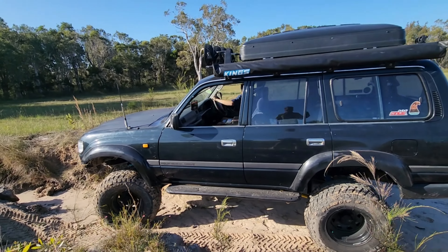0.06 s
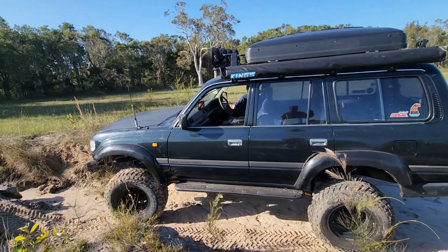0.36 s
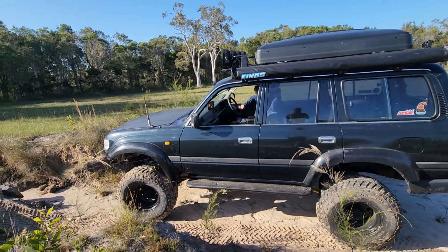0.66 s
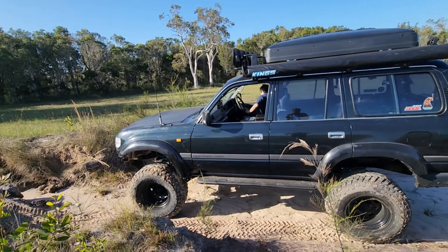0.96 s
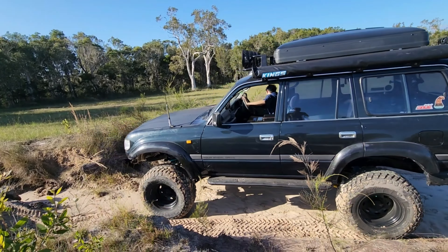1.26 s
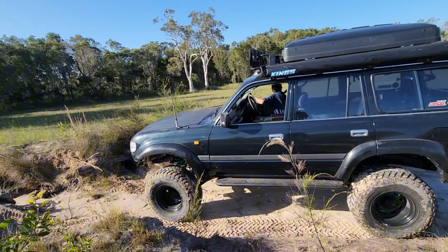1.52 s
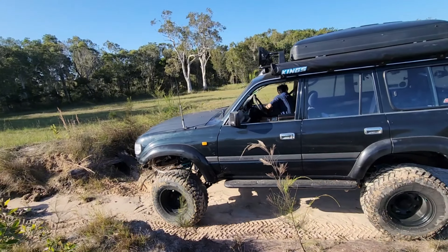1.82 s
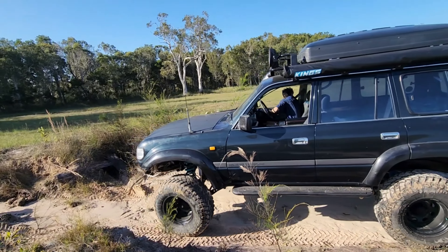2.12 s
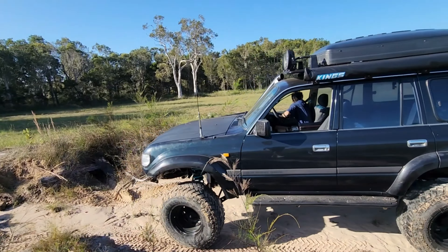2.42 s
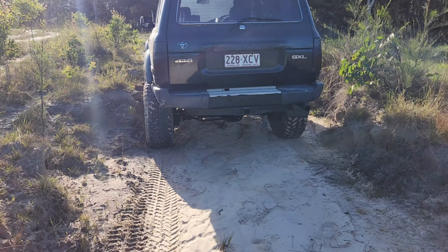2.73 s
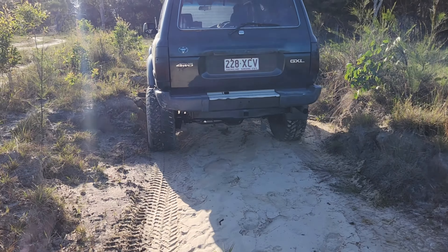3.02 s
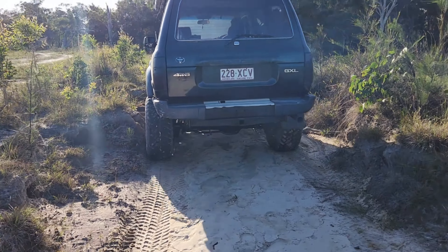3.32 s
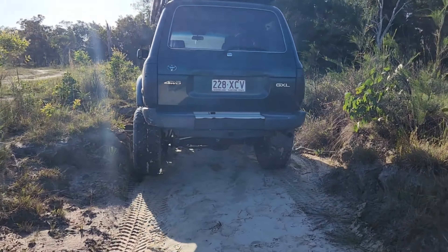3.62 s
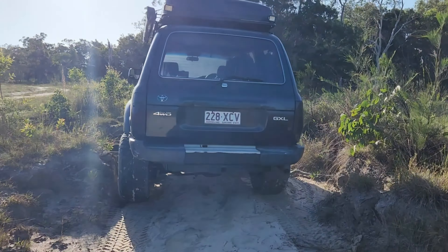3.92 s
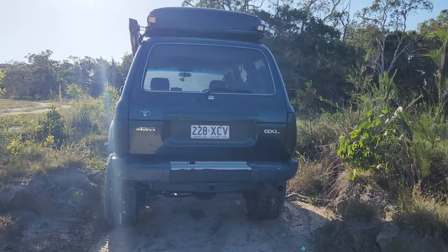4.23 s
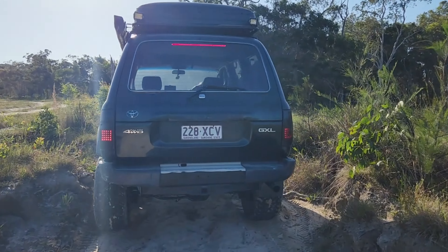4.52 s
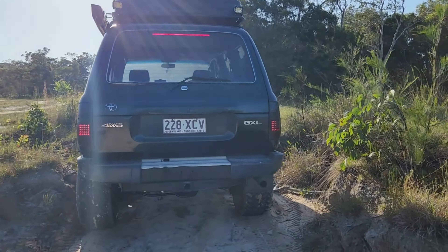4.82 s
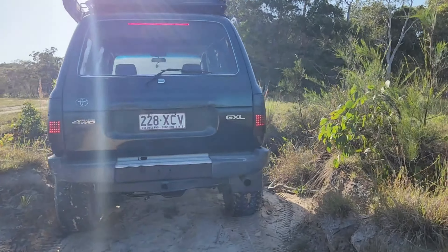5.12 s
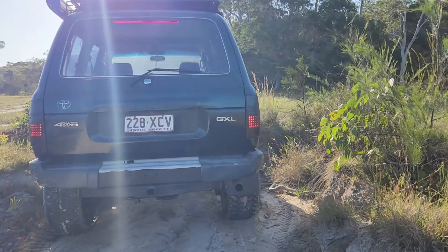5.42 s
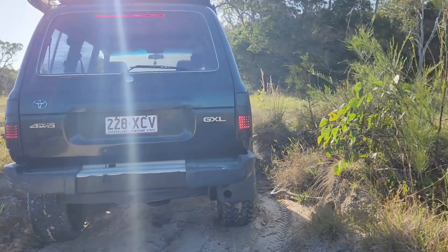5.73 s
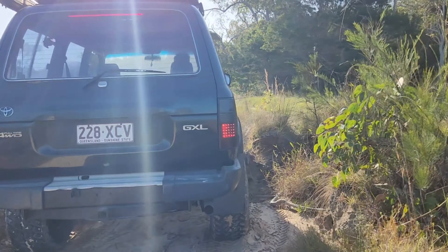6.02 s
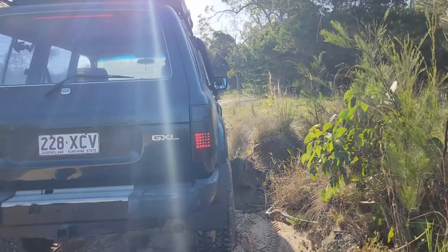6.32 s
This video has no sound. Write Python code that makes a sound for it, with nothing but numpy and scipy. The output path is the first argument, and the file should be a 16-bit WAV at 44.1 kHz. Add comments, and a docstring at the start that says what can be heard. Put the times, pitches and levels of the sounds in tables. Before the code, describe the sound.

Deep engine rumble from an off-road vehicle rises and falls, with one raspy rev, hissing sand and a few clacks before idling.

```python
"""A six-cylinder four-wheel-drive crawls through soft sand, heard side-on, then, after a gap, from behind.
Firing pulses boom in the exhaust pipe, which rasps in one hard rev and then drops to a lumpy idle.
The engine bay whirs, sand hisses under the tyres, metal parts clack, twigs snap,
the body thuds and the suspension creaks once."""
import sys
import numpy as np
from scipy import signal
from scipy.fft import rfft, irfft
from scipy.io import wavfile
from scipy.ndimage import uniform_filter1d

SR = 44100
rng = np.random.default_rng(int(sys.argv[2]) if len(sys.argv) > 2 else 0)


def digitize_waveform(pressure):
    """Quantize a signal to 16-bit integers and store it at the path in sys.argv[1].

    Rows of a 2-D input are taken as channels; values are limited to [-1, 1].
    """
    field = np.atleast_2d(pressure).T
    bounded = np.clip(field, -1, 1)
    quanta = np.round(bounded * 32767).astype(np.int16)
    wavfile.write(sys.argv[1], SR, quanta)


N = 289296
TIME = np.arange(N) / SR
FREQS = np.fft.rfftfreq(N, 1 / SR)
GAP_S = (2.717, 2.779)

# engine speed (time [s], firing rate [Hz])
SPEED = [(0, 45.7), (.17, 46.55), (.28, 45.2), (.55, 31.25), (.87, 30.66), (1.02, 32.7), (1.3, 39.23),
         (1.55, 41.81), (2.06, 42.89), (2.24, 47.7), (2.34, 53.93), (2.52, 56.3), (2.71, 52.8),
         (2.79, 45.84), (3.5, 47.24), (3.62, 53.84), (3.83, 76.96), (3.95, 78), (4.06, 70.23),
         (4.26, 46.95), (4.44, 33.68), (4.8, 32.27), (5.05, 34.35), (5.5, 32.35), (6, 33.99), (6.56, 33.08)]
# throttle stab (time [s], half-width [s], rasp swell [dB])
STAB = [(3.81, 0.22, 15.5)]
# nearness of engine bay and tyres (time [s], gain [dB])
NEARNESS = [(0, 0.5), (.8, 0.5), (2.1, 3), (2.71, 5), (2.79, 1.5), (3.5, 4), (4.1, -5), (4.8, -4),
            (5.8, -2), (6.3, 0), (6.56, 2)]


def exhaust(turns, puff_decay_turns=0.96, tone_lag_turns=0.4, rasp_gain_db=-2):
    """Firing pulses, each with a puff of turbulent gas, ring the pipe; high modes open up under load."""
    # pipe resonances (centre [Hz], width [Hz], side gain [dB], rear gain [dB])
    boom_modes = [(80.5, 25.4, 6, -4), (89.43, 9.05, 14.5, 16), (116, 14, -3, -9), (126.9, 15, 0.5, 5)]
    drone_modes = [(188.1, 20, 6.5, 8.5), (209.5, 14.4, 5.5, 5), (234.9, 18, -30, -11.5),
                   (275.2, 18.8, -4.5, -1), (287.7, 12.3, -5.5, -3), (355, 120, -14, -33.5)]
    rasp_modes = [(510, 38, -35.5, -7), (571, 10.1, -9, 3.5), (657, 11.2, -4, 6.5), (736, 19.4, -4.5, -6),
                  (910, 200, -22.5, -19.5)]
    tone_db, boom_db, drone_db, rasp_db = exhaust_levels()
    lumpy = lumpiness()
    pulses = firings(turns)
    puffs = unit(np.exp(-(turns % 1) / puff_decay_turns) * rng.standard_normal(N))
    gas = pulses + .3 * lumpy * puffs
    hiss = np.interp(rasp_db, [-48, -33], [1.6, .35]) * puffs  # under load the pulses take over
    growl = unit(pulses * (1 + .15 * np.cos(np.pi * turns)))  # every other firing is harder
    rumble = amp(-7) * np.sqrt(lumpy) * unit(band(puffs, 28, 82, order=2))
    waver = 1 + lumpy * unit(band(rng.standard_normal(N), 1.7, 12, order=2))
    tone = amp(tone_db) * (unit(np.cos(2 * np.pi * (turns - tone_lag_turns))) * waver + rumble)
    boom = amp(boom_db) * steady(band(ring(gas, boom_modes), 60.5, 134.1, order=4))
    drone = amp(drone_db) * steady(band(ring(gas, drone_modes), 164, 335.4, order=5))
    rasp = amp(rasp_db + rasp_gain_db) * steady(band(ring(growl + hiss, rasp_modes), 400, 1300))
    return outdoors(tone + boom + drone + rasp)


def firings(turns, jitter=0.075, bank_lag_turns=0.0052):
    """One pulse a firing, less the firing tone; every other cylinder has a longer manifold path."""
    # cylinders in firing order (strength [dB])
    cylinders = [0.7, 2.1, -1, -0.3, 1.54, 0]
    onsets = np.flatnonzero(np.diff(np.floor(turns))) + 1
    number = np.arange(len(onsets))
    size_error, time_error = rng.standard_normal((len(onsets), 2)).T * lumpiness()[onsets]
    shift = (jitter * time_error + bank_lag_turns * (-1) ** number) * np.gradient(onsets)
    strength = amp(np.take(cylinders, number, mode="wrap")) * (1 + size_error)
    pulses = np.zeros(N)
    pulses[np.clip(onsets + shift.astype(int), 0, N - 1)] = strength
    fundamental = 2 * np.gradient(turns) * np.cos(2 * np.pi * turns)
    return unit(pulses - fundamental)


def lumpiness(idle_hz=35.8, pulling_hz=45.7, pulling_share=.08):
    """The firings turn uneven as the engine drops to idle."""
    idling = np.interp(curves(SPEED)[0], [idle_hz, pulling_hz], [1, 0])
    idle_share = viewpoint(side=.12, behind=.28)
    return pulling_share + idling * (idle_share - pulling_share)


def exhaust_levels(fade_s=0.014):
    """Tone, boom, drone and rasp gains in dB; the pipe swells as firing harmonics cross its modes."""
    # resonance crossings (firing rate [Hz], half-width [Hz], swell [dB])
    boom_swells = [(38.2, 2.2, 3), (47.9, 4.5, 9.5), (59.93, 6.8, 9.5)]
    drone_swells = [(41.5, 2.5, 3.9), (48.4, 2.6, 3.26), (66, 1.5, 0.89), (72.94, 5, 4.87)]
    # spells of thin bass (start [s], end [s], tone gain [dB], boom gain [dB])
    thin_bass = [(-.1, 1.05, -7.5, 0), (2.7, 3.065, -9.5, -5)]
    firing_hz, = curves(SPEED)
    tone_dip_db, boom_dip_db = sum(
        np.outer(db, np.clip(np.minimum(TIME - start, end - TIME) / fade_s, 0, 1))
        for start, end, *db in thin_bass)
    tone_db = loudness(-32, -31.5, per_effort=2.4, db_per_octave=19)
    boom_db = loudness(-31, -26, per_effort=2.56, db_per_octave=1.5) + swell(firing_hz, boom_swells)
    drone_db = loudness(-31.5, -28.5, per_effort=1.83, db_per_octave=11) + swell(firing_hz, drone_swells)
    rasp_db = loudness(-48.5, -47.5, per_effort=1.07, db_per_octave=13) + swell(TIME, STAB)
    return tone_db + tone_dip_db, boom_db + boom_dip_db, drone_db, rasp_db


def loudness(side_db, behind_db, db_per_octave, per_effort=0, cruise_hz=46):
    """A layer's gain in dB, growing with engine effort and speed."""
    # how hard the engine works (time [s], effort [dB])
    effort = [(0, 4), (.24, 1), (.32, -2), (.5, -4), (.6, -2), (.78, -3.5), (.95, 0), (1.2, 0.1),
              (2.05, -0.5), (2.24, 2), (2.45, -1.5), (2.71, -3.5), (2.79, 2), (3.5, 2), (3.7, 2), (3.83, 2),
              (3.95, -1), (4.06, 0.5), (4.11, -5), (4.18, -1.5), (4.4, -4), (4.9, -0.5), (5.3, -2),
              (5.6, -0.2), (5.9, -2), (6.56, -2)]
    octaves = np.log2(curves(SPEED)[0] / cruise_hz)
    return viewpoint(side_db, behind_db) + per_effort * curves(effort)[0] + db_per_octave * octaves


def engine_bay(turns, throb=0.1, whine_order=30, shield_hz=4250, stab_share=.2, gain_db=4.5):
    """Fan and valve gear whir and throb with the firings; the alternator whines, a heat shield sings."""
    # whir spectra (frequency [Hz], relative density [dB])
    whir_side = [(300, 18.5), (460, -3), (700, 1.5), (1000, -3.5), (1450, -2.5), (1800, 0), (2050, 1.5),
                 (2250, 1.5), (2550, -4), (2900, -4), (3400, -6.5), (4800, -14.5)]
    whir_behind = [(300, 9.5), (400, 8.5), (600, 5.5), (830, -3.5), (1080, -3.5), (1280, -3.5),
                   (1550, -3.5), (1800, -2.5), (2050, -2.5), (2230, -0.5), (2600, -11.5), (3100, -13),
                   (4500, -43.5)]
    bay_db = loudness(-48, -51, per_effort=.5, db_per_octave=8.5)
    bay_db += curves(NEARNESS)[0] + stab_share * swell(TIME, STAB)
    noise = (1 + throb * np.cos(2 * np.pi * turns)) * rng.standard_normal((2, N))
    whir = viewpoint(pair(noise, whir_side) * amp([[-.6], [.6]]), pair(noise, whir_behind))
    flutter = unit(band(rng.standard_normal((2, N)), 0.67, 23, order=1))
    whine = amp(-14) * unit(flutter * np.cos(2 * np.pi * whine_order * turns))
    shield = amp(-21 + viewpoint(-1, 0)) * unit(flutter * np.cos(2 * np.pi * shield_hz * TIME))
    return amp(bay_db + gain_db) * (whir + whine + shield)


def sand(fizz_boost_db=5):
    """Rushing air and sand thrown by the tyres: a hiss that crackles when much sand flies."""
    # air and sand spectra (frequency [Hz], relative density [dB])
    rush_colour = [(1800, -14.5), (2900, -0.5), (4200, -2), (5300, -3.5), (6500, -8), (7600, -9.5),
                   (9000, -21), (11000, -27)]
    fizz_colour = [(5000, -13.5), (8000, -9.5), (10000, -14), (12500, -7), (15800, -9)]
    # sand sprays (time [s], half-width [s], fizz before boost [dB], rush [dB])
    sprays = [(.53, 0.15, -67, -66), (1.08, 0.14, -63.5, -74), (1.39, .1, -59.5, -71),
              (2.36, 0.28, -67, -52.5), (3.111, .16, -67.5, -62.5), (3.751, 0.19, -49.5, -42),
              (6.199, 0.25, -71.5, -65), (6.39, 0.072, -57, -62)]
    near_db, = curves(NEARNESS)
    spray_fizz, spray_rush = sum(np.outer(amp(db), bump(TIME, s, width)) for s, width, *db in sprays)
    rush = np.hypot(amp(loudness(-58, -55.5, db_per_octave=8.5) + near_db), spray_rush)
    fizz = np.hypot(amp(loudness(-69, -74.5, db_per_octave=13.5) + near_db), spray_fizz)
    flying = np.interp(20 * np.log10(fizz), [-72, -54], [0.36, amp(3)])
    grit = (rng.standard_normal((2, N)) + flying * grains()) / np.hypot(1, flying)
    return rush * pair(grit, rush_colour) + amp(fizz_boost_db) * fizz * pair(grit, fizz_colour)


def grains(per_s=1000, spread_db=2):
    """Sand grains click, mostly small, a few large."""
    size = amp(spread_db * np.minimum(rng.exponential(1, (2, N)), 4))
    return unit(size * rng.standard_normal((2, N)) * (rng.random((2, N)) < per_s / SR))


def clacks(band_ratio=1.6, gain_db=-5.5):
    """Metal clacks and snapping twigs: dying noise bursts with a bright edge and a dull knock."""
    # impacts (time [s], relative level [dB], centre [Hz], t60 [s])
    hits = [(.274, -26.5, 3700, 0.068), (.368, -25, 2300, 0.15), (0.382, -29, 6300, 0.066),
            (0.59, -40, 6200, 0.076), (3.093, -24.5, 1900, 0.013), (3.272, -35.5, 5960, 0.015),
            (3.45, -34, 1518, .015), (3.608, -42.5, 1800, 0.019), (3.671, -19.5, 3980, 0.015),
            (4.145, -47, 8260, 0.038), (4.175, -42.5, 8000, 0.046), (4.189, -38, 7950, 0.014),
            (4.278, -26.5, 3330, 0.0071), (4.463, -40.5, 1726, 0.22), (5.787, -49, 853, 0.04),
            (5.978, -42, 1245, 0.038), (6.034, -45, 1200, 0.021), (6.063, -40.5, 2012, 0.042),
            (6.208, -39.5, 6414, 0.011), (6.273, -36.5, 1500, 0.038), (6.336, -40, 13490, 0.026),
            (6.469, -40, 1196, 0.047)]
    out, t = np.zeros((2, N)), TIME[:SR // 4]
    for s, db, hz, t60 in hits:
        burst = rng.standard_normal((2, len(t))) + 0.35 * rng.standard_normal(len(t))
        core = unit(band(burst, hz / band_ratio, hz * band_ratio, order=2))
        edge = amp(-8) * unit(band(burst, 1500, 11500, order=2))
        knock = amp(-7) * unit(band(burst, 700, 2400, order=2))
        add(out, s, amp(db + gain_db - 60 * t / t60) * (core + edge + knock))
    return out


def thuds(blow_hz=285, rise_s=0.0014, scatter_db=-8.5, scatter_t60_s=0.24):
    """A short heavy blow rings the body panels and leaves a scattered tail."""
    # body blows (time [s], blow gain [dB], ring gain [dB])
    blows = [(.396, -6.5, -19.3), (4.461, -37, -37), (5.978, -42, -42)]
    # panel modes (frequency [Hz], relative level [dB], t60 [s])
    panel_modes = [(268, 2, 0.036), (358, -1.5, 0.13), (629, -6, 0.094), (727, -2.5, 0.071),
                   (900, -7.5, 0.058), (1023, -12, .08), (1285, -8, 0.068), (1393, -14, 0.036),
                   (2086, 0.5, 0.026)]
    out, t = np.zeros((2, N)), TIME[:SR // 3]
    blow = bump(t, .004, .0032) * np.cos(2 * np.pi * blow_hz * (t - .004))
    panels = sum(amp(db - 60 * t / t60) * np.sin(2 * np.pi * (hz * t + rng.random()))
                 for hz, db, t60 in panel_modes)
    onset = 1 - bump(t, 0, rise_s)
    for s, blow_db, ring_db in blows:
        scatter = unit(band(rng.standard_normal((2, len(t))), 250, 920, order=2))
        tail = scatter * amp(scatter_db - 60 * t / scatter_t60_s)
        add(out, s, amp(ring_db) * onset * (panels + tail) - amp(blow_db) * blow)
    return out


def creak(wobble_hz=160, overtone_db=-9):
    """Stick and slip in a spring bush: a rough, gliding tone."""
    # suspension creak (time [s], pitch [Hz], level [dB])
    glide = [(6.28, 1401, -74), (6.3, 1426, -47), (6.32, 1528, -47), (6.345, 1619, -52), (6.37, 1550, -77)]
    hz, db = curves(glide)
    wobble = unit(band(rng.standard_normal((2, N)), 30, 418, order=1))
    phase = 2 * np.pi * np.cumsum(hz + wobble_hz * wobble, axis=1) / SR
    gate = (TIME > glide[0][0]) & (TIME < glide[-1][0])
    return amp(db) * unit(np.sin(phase) + amp(overtone_db) * np.sin(2 * phase)) * gate


def outdoors(x, echo_db=-20.5, t60_s=0.25, delay_s=.008):
    """Banks and scrub scatter a faint, different echo to each side; the sum leans left."""
    t = TIME[:SR // 4]
    tail = rng.standard_normal((2, len(t))) * amp(-60 * t / t60_s) * (t > delay_s)
    echo = signal.oaconvolve(x[None], tail / np.linalg.norm(tail[0]), axes=1)[:, :N]
    return (x + amp(echo_db) * echo) * amp([[.55], [-.45]])


def viewpoint(side, behind):
    """Side-on before the gap, from behind after it."""
    return np.where(TIME < np.mean(GAP_S), side, behind)


def ring(x, modes):
    """Parallel resonances, alternating in sign as in a pipe."""
    return sum((-1) ** k * viewpoint(*amp(db)) * signal.lfilter(*signal.iirpeak(hz, hz / width, SR), x)
               for k, (hz, width, *db) in enumerate(modes))


def pair(x, colour):
    """Colours two unrelated signals into stereo, most alike in the low mids."""
    # left-right likeness (frequency [Hz], correlation [0-1])
    likeness = [(100, 0.3), (600, 0.89), (1000, 0.43), (2000, 0.3), (4000, 0), (12000, 0)]
    left, other = rfft(x)
    alike = read(likeness, FREQS)
    right = alike * left + np.sqrt(1 - alike ** 2) * other
    high_pass = 1 / (1 + (colour[0][0] / (FREQS + 1)) ** 4)
    low_pass = 1 / (1 + (FREQS / colour[-1][0]) ** 4)
    return unit(irfft(np.array([left, right]) * amp(read(colour, FREQS)) * high_pass * low_pass, N))


def steady(x, window_samples=5000):
    """Holds the slow level at rms 1, keeping single beats."""
    window = np.hanning(window_samples)
    power = abs(signal.oaconvolve(x ** 2, window / window.sum(), "same"))
    return x / np.sqrt(power + 1e-14)


def band(x, lo_hz, hi_hz, order=3):
    """Band-pass."""
    return signal.sosfilt(signal.butter(order, [lo_hz, hi_hz], "band", fs=SR, output="sos"), x)


def amp(db):
    """Decibels to gain."""
    return 10 ** (np.asarray(db) / 20)


def unit(x):
    """Scales to rms 1."""
    return x / np.sqrt(np.mean(x ** 2) + 1e-20)


def curves(rows):
    """Each column of a timed table, per sample."""
    s, *columns = np.transpose(rows)
    return [np.interp(TIME, s, c) for c in columns]


def read(points, hz):
    """Interpolates a spectrum over log frequency."""
    f, value = np.transpose(points)
    return np.interp(np.log(hz + 1), np.log(f), value)


def bump(x, centre, width):
    """Gaussian of height 1."""
    return np.exp(-((x - centre) / width) ** 2)


def swell(x, rows):
    """Sum of bumps along x, in dB."""
    return sum(db * bump(x, centre, width) for centre, width, db in rows)


def add(mix, s, sound):
    """Mixes a sound in at time s."""
    part = mix[..., round(s * SR):][..., :sound.shape[-1]]
    part += sound[..., :part.shape[-1]]


def scene():
    """All layers; engine speed times both exhaust and engine bay."""
    turns = np.cumsum(curves(SPEED)[0]) / SR + .9  # one turn per firing
    return exhaust(turns) + engine_bay(turns) + sand() + clacks() + thuds() + creak()


def record(dry):
    """A short silence between the viewpoints, then a low-pass."""
    gate = uniform_filter1d(1. * ((TIME < GAP_S[0]) | (TIME > GAP_S[1])), size=200)
    low_pass = signal.firwin(801, cutoff=15900, window=("kaiser", 10), fs=SR)
    return signal.oaconvolve(dry * gate, low_pass[None], "same")


dry = scene()
out = record(dry)
digitize_waveform(out)
```